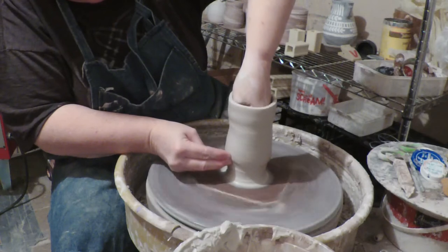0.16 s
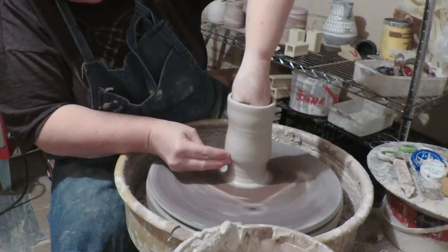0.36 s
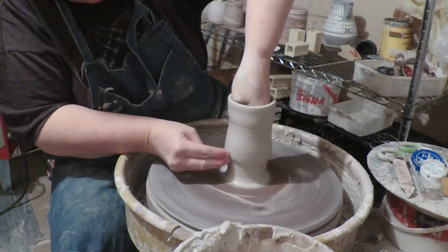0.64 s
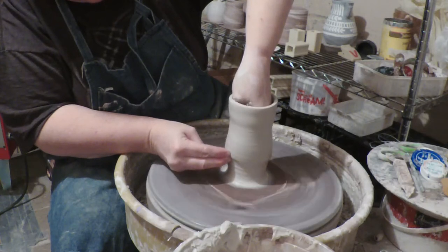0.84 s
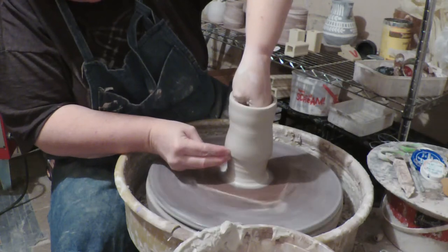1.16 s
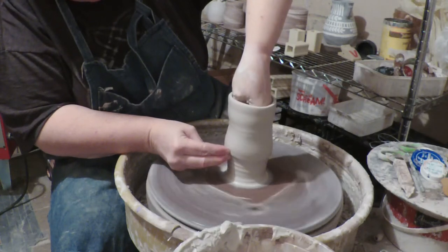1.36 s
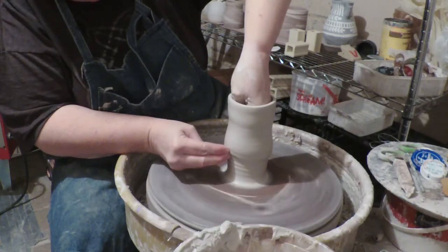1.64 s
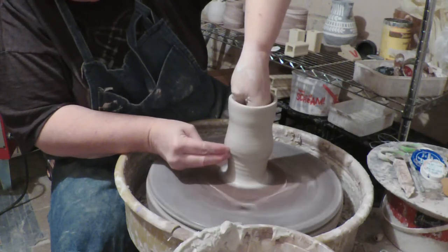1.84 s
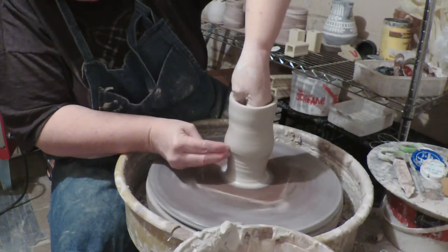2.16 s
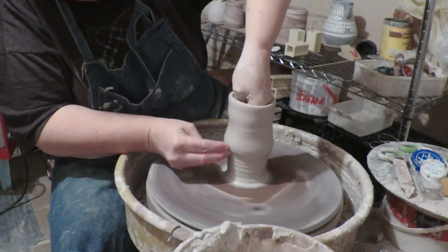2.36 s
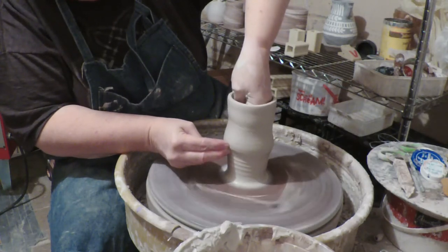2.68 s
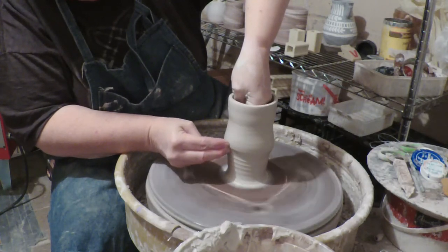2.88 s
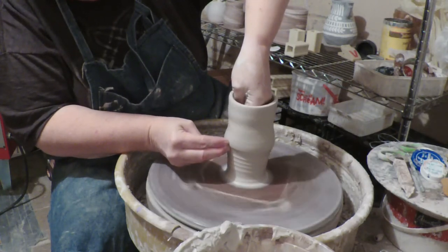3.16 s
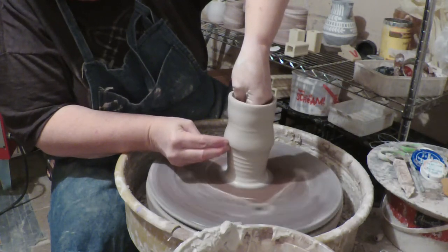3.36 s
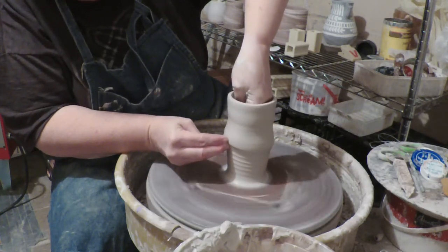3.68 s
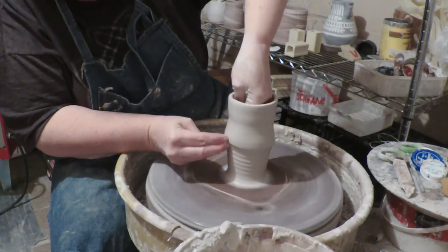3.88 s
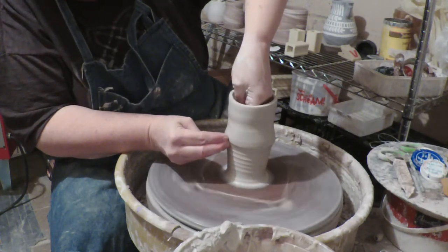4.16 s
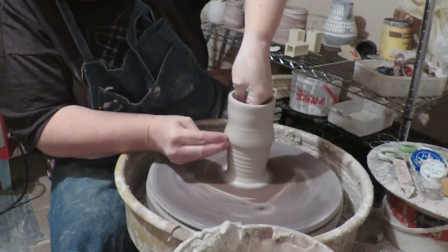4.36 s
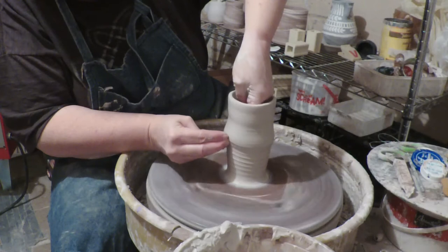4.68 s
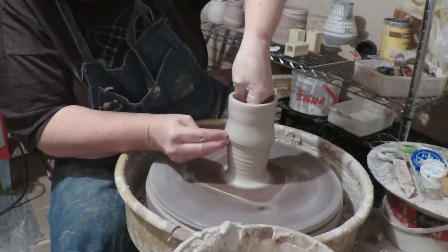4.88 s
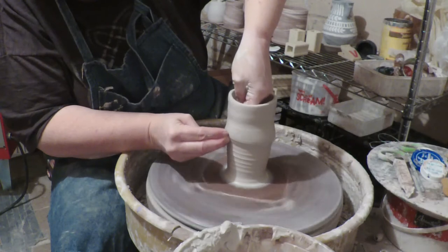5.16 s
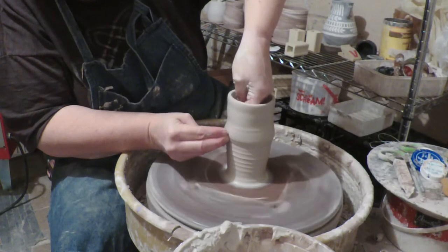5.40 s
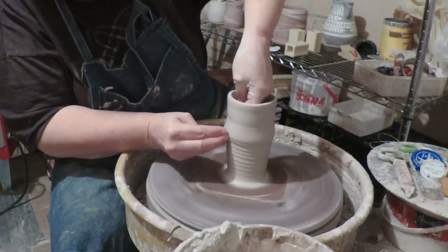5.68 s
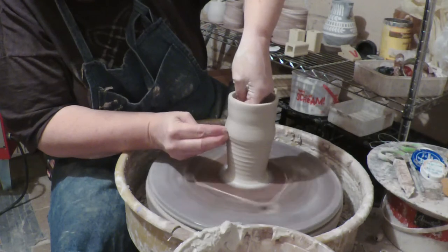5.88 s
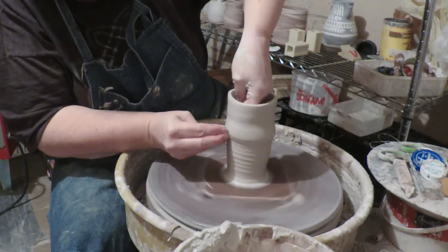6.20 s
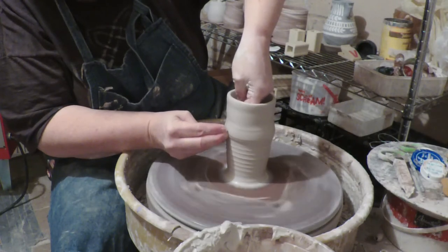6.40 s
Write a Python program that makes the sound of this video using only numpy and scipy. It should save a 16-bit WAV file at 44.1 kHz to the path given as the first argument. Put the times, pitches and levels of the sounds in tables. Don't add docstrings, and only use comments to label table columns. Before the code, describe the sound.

Close stereo sound of a potter's wheel already spinning, never starting or stopping. The motor drone is steady and heaviest on the right. Over it runs a rapid regular chatter of metal rubbing, with scratchy high squeaks and bright ticks, slightly uneven from turn to turn. Low frame rumble and soft room hiss lie underneath. Brief, barely audible wet finger slips and dry grit snaps appear occasionally.

```python
import sys
import numpy as np
from scipy import signal
from scipy.fft import rfft, irfft, next_fast_len
from scipy.io import wavfile
from scipy.ndimage import uniform_filter1d

SR = 44100
rng = np.random.default_rng(int(sys.argv[2]) if len(sys.argv) > 2 else 0)


def int16_out(signal):
    q = np.round(np.clip(np.atleast_2d(signal).T, -1, 1) * 32767)
    wavfile.write(sys.argv[1], SR, q.astype(np.int16))


def gain_from_db(level_db):
    decades = np.asarray(level_db, float) / 20
    return 10 ** decades


N = 288458
TIME = np.arange(N) / SR

MAINS_HZ, SHAFT_HZ, PULLEY_HZ, BELT_HZ, WHEEL_HZ = 60.015, 29.11, 9.322, 1.138, 1.003

# frequency in Hz, left and right in dB per Hz, left-right likeness (-1 to 1).
ROOM_HISS = [(8.5, -94.5, -89.5, .5), (16, -79, -73, 0.33), (41, -88, -82, 0.34), (87, -79, -84.5, -0.32),
             (208, -88.5, -76.5, 0), (401, -82.5, -83.5, 0.28), (553, -87.5, -82.5, 0.8),
             (810, -89.5, -89, -0.038), (1250, -94, -92.5, 0.47), (1770, -98, -93.5, .4),
             (3100, -101, -99, 0.52), (6060, -104, -103, -0.16), (9800, -105, -104, -0.01),
             (14700, -108.5, -108.5, -0.072), (15200, -112, -112, 0.05)]
# frequency in Hz, left and
# right level in dB, right phase lead in rad, start in turns.
BEATING_TONES = [(28.75, -73, -77, -.17, .65), (29.1, -65.5, -74, .3, .09), (29.95, -72, -69.5, 0, .21),
                 (59.28, -73, -71, -1.3, .07), (119.02, -72, -70, 1.42, .275),
                 (121.02, -79, -73, 3.08, -.28)]
# frequency in Hz, width in Hz, left and right level in dB.
FRAME_MODES = [(350, 49, -76, -59.5), (313, 24, -67.5, -69), (435.5, 54, -65, -59), (499, 41, -70.5, -69.5),
               (1021, 59, -75, -68.5), (1158, 69, -72, -81), (1457, 83, -69, -72.5),
               (1500, 33, -73.5, -73.5), (2170, 250, -81.5, -68), (2655, 110, -75, -68),
               (2792, 40, -84.5, -74), (2923, 80, -82, -77)]
# centre in seconds, length in seconds, pot ring in Hz, width in Hz, level in dB.
FINGER_SLIPS = [
    (.42, .05, 1730, 200, -63),
    (0.501, 0.076, 1390, 200, -63),
    (0.53, .06, 1740, 200, -65),
    (3.6, .2, 1140, 350, -64),
    (5.195, 0.018, 1090, 150.8, -57),
    (5.286, .012, 1100, 150, -61),
    (5.345, .03, 1093, 180, -58),
    (6.13, 0.039, 1310, 250, -60),
    (6.236, 0.079, 1150, 301.6, -59),
    (6.32, 0.061, 1744, 400, -66),
]
# time in seconds, peak in dB, frequency in Hz.
GRIT_SNAPS = [
    (.2463, -60, 10500),
    (3.7779, -55, 11000),
    (4.739, -56, 8500),
    (5.4328, -60, 8500),
    (2.809, -61, 8500),
    (.771, -64, 8000),
]

# time in seconds, lead in thousandths of a turn.
PULLEY_LEAD = [(0.0, 3.62), (0.54, -0.28), (0.77, 7.09), (1.07, 2.96), (1.62, -1.68), (1.92, 5.61),
               (2.23, -0.9), (2.81, -1.33), (3.08, 3.8), (3.34, -1.16), (3.65, 1.26), (4.27, 2.53),
               (4.46, -1.76), (5.2, -3.87), (5.35, -3.06), (5.61, -8.45), (6.08, -1.36), (6.54, 0.24)]
WHEEL_LEAD_TURNS, WHEEL_LEAD_PHASE_TURNS = .0019, -.328

# lumps round the belt, swing in dB, phase in turns.
BELT_LUMPS = [(1, .7, .32), (3, .95, .09), (4, 1.1, -.46)]
# time in seconds, extra level in dB.
ODD_TURNS = [(.06, -1.5), (.17, -2), (2.1, 2.5), (2.21, 0.5), (2.53, -0.5), (.92, -1), (1.03, 1), (3.39, 2),
             (4.03, 1), (4.78, -2), (5.43, 0), (5.64, 1.5), (5.75, -1), (5.86, 2), (6.5, -2)]
# start in seconds, extra level in dB.
ODD_TICKS = [(0.45, -3.5), (0.67, -4.7), (1.42, -3.1), (1.52, -2.7), (1.63, -1), (2.27, -1), (2.81, 3),
             (3.67, 2.5), (3.88, -2), (3.99, -2.4), (5.06, 0), (5.17, 1.5), (6.35, 2)]
WHEEL_PRESS_DB, WHEEL_PRESS_TURNS, TURN_CHANCE_DB = 0.2, -0.17, 0.85
RUB_DB, CHATTER_DB, CHATTER_FOLLOWS, CHATTER_CREEP_DB_PER_S = -64, -69.5, 0.5, 0.1

# share of the turn, level in dB.
RUB_TURN = [(0, -15), (.1, -16), (.16, -6.5), (.25, -7.5), (.28, -7), (.33, -11), (.45, -10.5), (.48, -7),
            (.58, -7), (.63, -4), (.68, -11.5), (.75, -5), (.8, -10.5), (1, -9.5)]
DRAG_TURN = [(0, -14.5), (.15, -12), (.2, -4), (.4, -4), (.5, -3), (.62, 0), (.69, -7.5), (.77, -7),
             (.85, -6.5), (1, -9)]
CHATTER_TURN = [(0, -9.5), (.2, -9), (.27, -1), (.31, -6.5), (.47, -6), (.51, -4.5), (.62, -1), (.72, -7),
                (.75, -8.5), (.8, -7), (.86, -2), (.94, -13.5), (1, -13)]
TICK_TURN = [(0, -18), (.15, -12), (.19, 3.5), (.24, 0), (.35, -4), (.39, -8), (.5, -5), (.65, -5),
             (.73, -1), (1, -17.5)]
KNOCK_TURN = [(0, -2.5), (.08, 1), (.11, 0), (.13, -6), (.29, -5), (.34, 0), (.38, -5), (.46, -1),
              (.52, -6), (.62, -5.5), (.65, 2), (.78, 0), (.81, -4), (.85, -0.5), (.89, -5), (1, -1.5)]
# frequency in Hz, width in Hz, left and right level in dB.
RUB_MODES = [(4150, 44, -9, -2.5), (4265, 16, -2, 3.5), (4350, 45, -1, 6), (4350, 24, -6, 4),
             (4476, 47, 0, 1)]
DRAG_MODES = [(3360, 130, 0, -8), (3573, 20, -3.5, -2.5), (3817, 45, -6, 0), (3934, 46, -1, 6)]
CHATTER_MODES = [(4780, 65, -1.5, 1.5), (5090, 55, -2, -5), (5410, 99, -7, -4.5), (7010, 47, -7.5, -6.5),
                 (7430, 270, -8.5, 3.5), (7800, 110, -3.5, -6)]
TICK_MODES = [(4620, 57, -8, 4), (4707, 53, -4, -9), (8070, 40, -8.5, -4.5), (8220, 30, -10, -5.5),
              (8238, 34, -7, -8.5), (8370, 120, -6, -2.5), (8440, 70, -6, -4.5), (8640, 150, -6, -4),
              (9100, 350, -8, -3.5)]
KNOCK_MODES = [(1930, 61, -3.5, -3.5), (2398, 100, 3, 1.5), (2480, 44, -5, 1)]
# share of the turn, pitch in Hz, level in dB.
SQUEAK_TURN = [(0, 4393, -21), (.15, 4700, -20), (.2, 4645, 2), (.26, 4620, -0.5), (.33, 4350, -3.5),
               (.5, 4353, 1.5), (.75, 4350, -7), (.9, 4290, -11.5), (1, 4385, -20)]

# order of the pulley turn, left and right level in dB, right phase lead in rad.
PULLEY_TONES = [(4, -69.3, -70.7, -0.08), (15, -70.0, -71.2, 0.92), (16, -65.3, -64.1, 0.29),
                (32, -51.6, -46.8, 0.75), (33, -64.6, -59.4, 0.85), (34, -69.6, -76, -2.5),
                (35, -69.7, -64.3, -0.8), (43, -69.2, -70.2, 1.31), (46, -68.3, -66.3, -2.97),
                (47, -66, -70.5, 1.7), (48, -57.4, -56.1, 2.41), (49, -66.8, -73, 2.3),
                (53, -74.6, -67.4, -0.73), (69, -82, -77, -.5), (76, -84, -78, .1), (92, -61, -62.3, .95),
                (94, -58.9, -60.6, 0.86), (96, -70.3, -71.3, 0.8), (160, -70.8, -71, 0.13),
                (261, -83, -85, .44), (262, -77.5, -76.5, .34), (264, -82, -78, .97),
                (265, -78, -76.5, 1.41), (267, -85, -80, .29), (268, -83, -80, .69)]
# order of the pulley turn, left and right level in dB, start in turns.
BELT_SIDEBANDS = [(91, -72.4, -77, -.17), (91.489, -71.5, -72.6, -.41), (91.633, -74.7, -75.5, .37),
                  (92.88, -68.6, -72.3, .74), (93, -74.7, -77.5, -.14), (93.512, -75.4, -77.1, .6),
                  (93.632, -73.1, -74.5, .43), (93.736, -74.3, -76.9, -.19), (93.816, -72, -74.1, .53),
                  (93.88, -67.7, -69, .42), (94.112, -71.7, -73.2, .26)]
# time in seconds, level in dB.
FRAME_NOTE = [(0.0, -58), (0.51, -51), (0.73, -56), (1.37, -51.5), (1.91, -61.5), (2.11, -50.5),
              (2.8, -59.5), (3.2, -53.5), (3.88, -55.5), (4.21, -55.5), (4.46, -50), (5.28, -58),
              (5.61, -51), (5.92, -59.5), (6.28, -50), (6.38, -57.5), (6.54, -51.5)]
NOTE_START_TURNS = {92: .05, 94: -.02, 96: .21}
NOTE_BEAT_DB, NOTE_BEAT_TURNS = 2.5, .0
NOTE_LEAD_RAD, NOTE_LEAD_SAMPLES = .95, 7
NOTE_SWELL_SHARE = .45

# frequency in Hz, left and right level in dB, right phase lead in rad.
WHISTLE = (8271.7, -78, -74, 1.9)
# mains multiple, left and right level in dB, right phase lead in rad.
HUM = [(1, -65.5, -72, -0.9), (2, -57.2, -60.5, 2.83), (4, -38.5, -32.2, -1.86), (6, -48.8, -25.9, -1.4),
       (8, -49.7, -55.7, 0.34), (10, -54.7, -49.5, 0.32), (12, -59.4, -67.4, 0.91),
       (16, -73.3, -73.0, -0.02), (18, -78.2, -62.1, -0.34), (20, -79.6, -76.8, -1.15),
       (22, -77.5, -71.3, -0.17), (26, -82.5, -80.2, 0.69), (32, -77.1, -83.0, -0.51),
       (34, -78.5, -72.4, -0.85), (36, -83.5, -72.9, 0.25), (37, -85.0, -82.7, 0.1),
       (38, -74.3, -73.0, 0.81), (40, -76.4, -78.2, -0.19), (42, -84.2, -83.5, -0.01),
       (44, -76.0, -68.3, 0.53), (46, -68.9, -62.4, 0.28), (47, -83.3, -83.6, -2.41),
       (48, -75.7, -69.5, 1.31), (52, -86.2, -83.4, 0.36), (54, -86.9, -87.0, -0.1),
       (62, -92.9, -85.7, -2.04), (64, -88.5, -83.8, -1.1)]
WHEEL_LOAD = {4: (0.25, 0.29, -0.022, .3, -.13), 6: (.63, 0.024, .14, 0.56, -0.09),
              8: (0.35, 0.28, 0.82, 0.26, .55), 10: (.7, 0.53, 0.7, 0.067, 0.13)}
# mains multiple, shaft order, left and right level in dB, right phase lead in rad.
SHAFT_SIDEBANDS = [(0, 32, -82.3, -74.2, 0.67), (2, -1, -68.5, -69.6, -2.66), (4, 1, -58.5, -58.2, -0.58),
                   (6, -1, -69.4, -59.3, -0.23), (6, 1, -63.8, -68.9, 0.18), (6, 2, -66.7, -65.1, 1.79),
                   (8, -1, -66.8, -66.6, 1.73), (8, 1, -66.1, -59.7, 0.04), (10, -1, -73.0, -72.9, 0.76),
                   (10, 2, -77.2, -68.4, -0.78), (12, -1, -77.3, -74.0, -0.19)]
# mains multiple, pulley order, left and right level in dB, right phase lead in rad.
PULLEY_SIDEBANDS = [(2, -1, -68.0, -66.5, 2.84), (4, 2, -69.5, -65.1, -0.42), (6, -4, -67.9, -65.9, -0.45),
                    (6, -2, -76.1, -61.1, 1.52), (6, -1, -69.2, -62.0, -0.85), (6, 1, -68.8, -60.2, -0.08),
                    (6, 2, -76.2, -62.5, -0.49), (8, -2, -68.7, -72.1, -3.12), (8, -1, -69.0, -76.7, -2.57),
                    (8, 1, -67.9, -66.7, 1.32), (8, 2, -64.4, -60.9, -0.3), (12, -4, -77.3, -73.1, -0.04),
                    (12, -2, -74.3, -70.3, -0.54)]


def rms_one(x):
    return x / np.sqrt(np.mean(x ** 2) + 1e-20)


def swing(turns):
    return np.cos(2 * np.pi * turns)


def drift(rate_hz):
    r = np.exp(-80 * np.pi * rate_hz / SR)
    noise = rng.standard_normal(N // 40 + 4002)
    slow = signal.lfilter([1], [1, -2 * r, r * r], noise)[4000:]
    return np.interp(np.arange(N) / 40, np.arange(len(slow)), rms_one(slow - slow.mean()))


def tone(turns, left_db, right_db, lead_rad, waver_db):
    angle = 2 * np.pi * turns
    left = gain_from_db(left_db) * np.sin(angle)
    right = gain_from_db(right_db) * np.sin(angle + lead_rad)
    return np.sqrt(2) * gain_from_db(waver_db) * np.array([left, right])


def pair(alike, source):
    alike = np.clip(alike, -1, 1)
    shared = np.sqrt((1 + alike) / 2) * source[0]
    opposed = np.sqrt((1 - alike) / 2) * source[1] * [[1], [-1]]
    return shared + opposed


def resonate(drive, modes, count=1):
    out = np.zeros(drive.shape)
    for k, (hz, width_hz, left_db, right_db) in enumerate(modes):
        r = np.exp(-np.pi * width_hz / SR)
        stage = [1, 0, -1, 1, -2 * r * np.cos(2 * np.pi * hz / SR), r * r]
        ring = rms_one(signal.sosfilt([stage] * count, drive))
        out += (-1) ** k * ring * gain_from_db(np.array([[left_db], [right_db]]))
    return out


def hiss():
    hz, left_db, right_db, alike = np.transpose(ROOM_HISS)
    size = next_fast_len(N)
    log_hz = np.log(np.maximum(np.arange(size // 2 + 1) * SR / size, 1))
    left_db, right_db, alike = [np.interp(log_hz, np.log(hz), c) for c in (left_db, right_db, alike)]
    white = rfft(rng.standard_normal((2, size))) * np.sqrt(SR / 2)
    shaped = pair(alike, white) * gain_from_db(np.array([left_db, right_db]))
    return irfft(shaped, size)[:, :N]


def frame():
    rumble = pair(0.5, rng.standard_normal((2, N)))
    return resonate(gain_from_db(1.4 * drift(3.8)) * rumble, FRAME_MODES, count=2)


def beating():
    out = np.zeros((2, N))
    for hz, left_db, right_db, lead_rad, start in BEATING_TONES:
        out += tone(hz * TIME + start, left_db, right_db, lead_rad, .5 * drift(2))
    return out


def snaps():
    out = np.zeros(N)
    for s, peak_db, hz in GRIT_SNAPS:
        near = abs(TIME - s) < .005
        age = TIME[near] - s
        out[near] += gain_from_db(peak_db) * np.exp(-(age / .0003) ** 2) * np.sin(2 * np.pi * hz * age)
    return out


def slips():
    out = np.zeros((2, N))
    for s, length_s, hz, width_hz, level_db in FINGER_SLIPS:
        near = abs(TIME - s) < .5
        friction = pair(0.55, rng.standard_normal((2, SR + 1)))[:, :near.sum()]
        swell = np.exp(-((TIME[near] - s) / length_s) ** 2)
        out[:, near] += swell * resonate(friction, [(hz, width_hz, level_db, level_db - 1.5)], count=2)
    return out


def pulley_angle():
    clay = WHEEL_LEAD_TURNS * swing(WHEEL_HZ * TIME + WHEEL_LEAD_PHASE_TURNS)
    lead = np.interp(TIME, *np.transpose(PULLEY_LEAD))
    hands = uniform_filter1d(lead, size=SR // 10) / 1000
    return PULLEY_HZ * TIME + clay + hands + 0.00027 * drift(11)


def pressure():
    s = (np.arange(int(PULLEY_HZ * N / SR) + 1) + .6) / PULLEY_HZ
    press_db = WHEEL_PRESS_DB * swing(WHEEL_HZ * s + WHEEL_PRESS_TURNS)
    press_db += TURN_CHANCE_DB * rng.standard_normal(len(s))
    for lumps, db, turns in BELT_LUMPS:
        press_db += db * swing(lumps * BELT_HZ * s + turns)
    for at, db in ODD_TURNS:
        press_db += db * (abs(s - at) < .5 / PULLEY_HZ)
    return np.interp(TIME, s, press_db)


def contact(pulley, level_db, turn, modes, grain_db, flicker_db, alike):
    share, turn_db = np.transpose(turn)
    gate = gain_from_db(np.interp(pulley % 1, share, turn_db) + flicker_db * drift(49))
    grain_sizes = np.minimum(rng.exponential(1, N), 5)
    grains = rng.standard_normal((2, N)) * gain_from_db(grain_db * grain_sizes)
    return gain_from_db(level_db) * rms_one(resonate(gate * pair(alike, grains), modes))


def housing(pulley, rub_db, press_db):
    creep_db = CHATTER_CREEP_DB_PER_S * (TIME - TIME.mean())
    chatter_db = CHATTER_DB + CHATTER_FOLLOWS * press_db + creep_db
    accent_db = sum(db * (abs(TIME - at - .03) < .5 / PULLEY_HZ) for at, db in ODD_TICKS)
    tick_db = chatter_db + accent_db + 0.9
    out = contact(pulley, rub_db, RUB_TURN, RUB_MODES, grain_db=0.5, flicker_db=0.4, alike=0.48)
    out += contact(pulley, rub_db - 6.5, DRAG_TURN, DRAG_MODES, grain_db=-1.5, flicker_db=-0.4, alike=0.78)
    out += contact(pulley, chatter_db - 0.5, CHATTER_TURN, CHATTER_MODES,
                   grain_db=1.5, flicker_db=2.0, alike=0.65)
    out += contact(pulley, tick_db, TICK_TURN, TICK_MODES, grain_db=4.5, flicker_db=-1.0, alike=0.46)
    out += contact(pulley, -66.5, KNOCK_TURN, KNOCK_MODES, grain_db=-0.2, flicker_db=-1.0, alike=.75)
    return out


def squeak(pulley, level_db):
    share, hz, spot_db = np.transpose(SQUEAK_TURN)
    place = pulley % 1
    roughness = 1 + 0.00414 * drift(31) + 0.00405 * drift(3.05)
    turns = np.cumsum(np.interp(place, share, hz) * roughness) / SR
    strength_db = level_db + np.interp(place, share, spot_db) + 1.3 * drift(9.8)
    note = tone(turns, -1.4, -1.3, 0.58, strength_db)
    octave = tone(2 * turns, -16.0, -7.5, 2.3, strength_db + 1.4 * drift(60))
    return note + octave


def pulley_song(pulley):
    note_db = np.interp(TIME, *np.transpose(FRAME_NOTE))
    beat_db = NOTE_BEAT_DB * swing(2 * pulley + NOTE_BEAT_TURNS)
    left, right = resonate(pair(1.0, rng.standard_normal((2, N))), [(864.6, 32.0, -6.5, -8.5)], count=2)
    out = np.array([left, np.roll(right, -NOTE_LEAD_SAMPLES)]) * gain_from_db(note_db + beat_db)
    for order, left_db, right_db, lead_rad in PULLEY_TONES:
        near_note = 90 < order < 98
        swell_db = NOTE_SWELL_SHARE * (note_db - note_db.mean()) * near_note
        turns = order * pulley + NOTE_START_TURNS.get(order, 0)
        out += tone(turns, left_db, right_db, lead_rad, swell_db + .8 * drift(2.8))
    for order, left_db, right_db, start in BELT_SIDEBANDS:
        out += tone(order * pulley + start, left_db, right_db, NOTE_LEAD_RAD, .8 * drift(2.8))
    return out


def windings(pulley):
    mains = MAINS_HZ * TIME + 0.0015 * drift(0.31)
    shaft = SHAFT_HZ * TIME + 0.006 * drift(3.7)
    wheel = WHEEL_HZ * TIME
    whistle_hz, *whistle_levels = WHISTLE
    out = tone(whistle_hz * TIME, *whistle_levels, 1.5 * drift(4))
    for multiple, left_db, right_db, lead_rad in HUM:
        unsteady_db = min(0.025 * multiple, 1.2) * drift(7.0)
        if multiple in WHEEL_LOAD:
            once_db, once, twice_db, twice, creep_db = WHEEL_LOAD[multiple]
            unsteady_db += once_db * swing(wheel + once)
            unsteady_db += twice_db * swing(2 * wheel + twice)
            unsteady_db += creep_db * (TIME - TIME.mean())
        late = .2 + .25 * max(multiple - 10, 0)
        out += tone(multiple * mains - late, left_db, right_db, lead_rad, unsteady_db)
    for rotor, sidebands in ((shaft, SHAFT_SIDEBANDS), (pulley, PULLEY_SIDEBANDS)):
        for multiple, order, left_db, right_db, lead_rad in sidebands:
            turns = multiple * mains + order * rotor + rng.random()
            out += tone(turns, left_db, right_db, lead_rad, 1.2 * drift(2.8))
    return out


def scene():
    pulley = pulley_angle()
    press_db = pressure()
    rub_db = RUB_DB + press_db
    background = hiss() + frame() + beating()
    clay_and_grit = slips() + snaps()
    drive = housing(pulley, rub_db, press_db) + squeak(pulley, rub_db - .8) + pulley_song(pulley)
    return background + clay_and_grit + drive + windings(pulley)


def roll_off(x):
    return signal.sosfilt(signal.butter(12, 15160, fs=SR, output="sos"), x)


def record(dry):
    return roll_off(dry)


dry = scene()
out = record(dry)
int16_out(out)
```